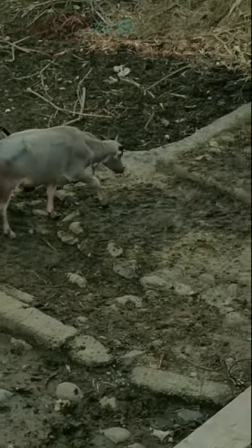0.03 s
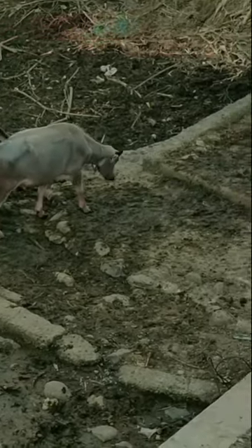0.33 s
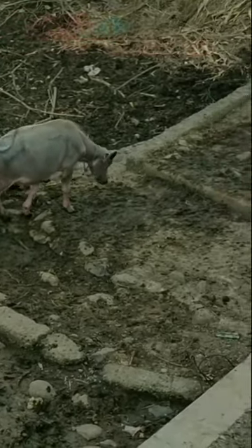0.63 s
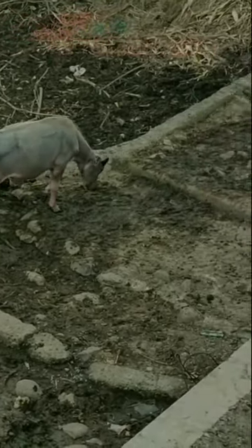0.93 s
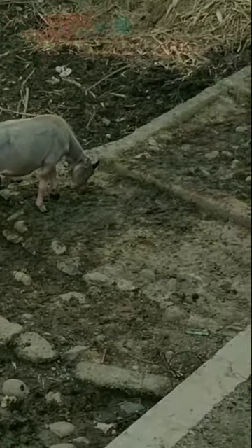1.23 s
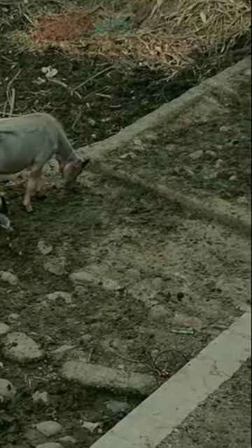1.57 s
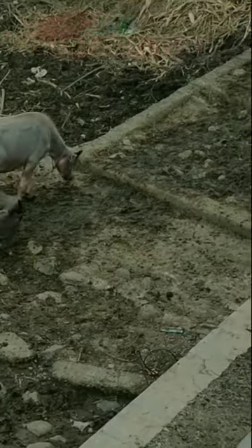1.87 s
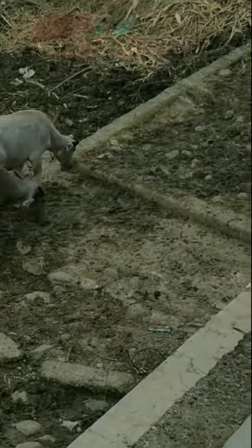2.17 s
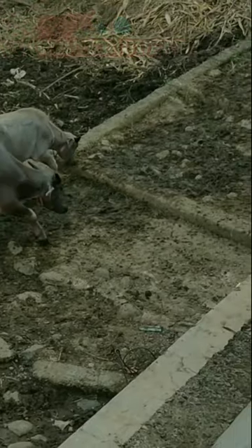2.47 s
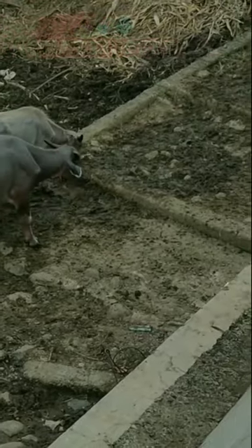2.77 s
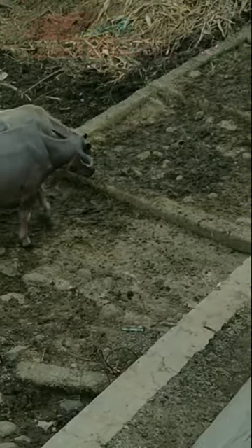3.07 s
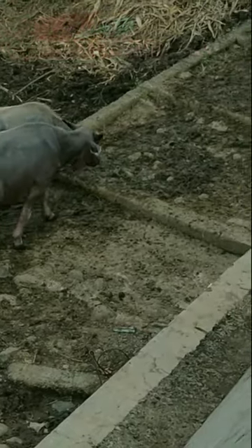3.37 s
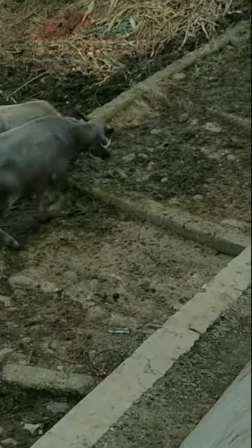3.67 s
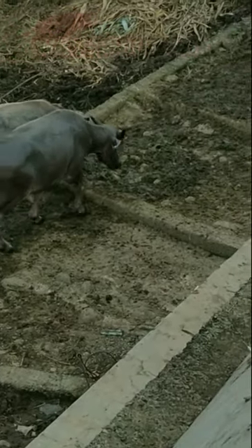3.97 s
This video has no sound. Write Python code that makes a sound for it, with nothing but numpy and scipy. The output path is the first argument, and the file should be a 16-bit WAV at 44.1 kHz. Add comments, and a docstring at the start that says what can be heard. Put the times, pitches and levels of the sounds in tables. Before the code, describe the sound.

A slow diesel engine, probably a small tractor, chugs past a yard, its beat gradually slowing. It throbs at a distance at first, swells from about 1 second and is loudest between 2 and 3 seconds, with distinct metallic knocking, then deepens and recedes. Tyre noise and distant traffic rumble underneath. Buffalo hooves thud dully in the first second and near the end, with faint muddy squelches between.

```python
"""A slow single-cylinder diesel, probably a small farm tractor, chugs past a muddy yard.
Its beat sinks from 30 to under 24 firings a second. Each firing is an exhaust thump, a puff of gas
and a metallic knock, smeared by the yard while far and distinct as it passes.
Tyre noise and farther traffic lie underneath; buffalo tread faintly in the mud."""
import sys
import numpy as np
from scipy import signal
from scipy.fft import rfft, irfft
from scipy.io import wavfile
from scipy.ndimage import uniform_filter1d

SR = 44100
rng = np.random.default_rng(int(sys.argv[2]) if len(sys.argv) > 2 else 0)


def dump_mix(stems):
    """Bounce the given channels to the path in sys.argv[1] as a 16-bit WAV at rate SR."""
    frames = np.atleast_2d(stems).T  # one column per channel
    limited = np.clip(frames, -1, 1)  # hard clip at full scale
    pcm = np.round(limited * 32767).astype(np.int16)
    wavfile.write(sys.argv[1], SR, pcm)


N = 176400
TIME_S, FREQ_HZ = np.arange(N) / SR, np.fft.rfftfreq(N, 1 / SR)
KNOCK_SPREAD_DB = .8
# Engine speed. Each row: time in seconds, firings per second.
FIRING_HZ = [(0, 30.2), (.7, 29.6), (1.1, 28.75), (1.3, 27.9), (1.7, 26.82), (2.1, 26.26), (2.3, 25.96),
             (2.85, 25.4), (3.02, 25.05), (3.3, 25.6), (3.5, 24.5), (3.7, 24.1), (4, 23.5)]


def firings(anchor_s=2.268):
    """Sample positions of the firings: one per engine cycle, phased to anchor_s, then jittered."""
    # Each row: time in seconds, timing scatter in seconds.
    jitter_s = [(0, 0.0007), (1.1, 0.00054), (1.5, 0.000065), (3.1, 0.00012), (3.45, 0.00078), (4, 0.0016)]
    cycles = np.cumsum(over_time(FIRING_HZ)) / SR
    at = np.flatnonzero(np.diff(np.floor(cycles - cycles[round(anchor_s * SR)])))
    offsets = over_time(jitter_s)[at] * SR * rng.standard_normal(len(at))
    return np.clip(at + offsets.astype(int), 0, N - 1)


def exhaust_thump(at, lag_s=.001, pass_s=2.02, turnover_s=.12):
    """Each firing rings the exhaust pipe, which sounds deeper once the vehicle has passed."""
    # Pipe from ahead and from behind. Each row: frequency in Hz, gain in dB.
    ahead_db = [(15, -63), (28, -51), (54, -30), (80, -24), (108, -11.5), (136, -2), (163, 1.5),
                (190, -14.5), (215, -11.5), (240, -12), (285, -22.5), (335, -20), (380, -25.5), (520, -27),
                (900, -51.5), (2000, -68)]
    behind_db = [(15, -58), (26, -38), (51, -22), (76, -34), (101, -8), (128, -0.5), (154, 3.5),
                 (180, -10.5), (235, -20.5), (280, -29.5), (305, -16.5), (330, -10.5), (380, -27),
                 (430, -33.5), (485, -27), (540, -32.5), (900, -45), (2000, -63.5)]
    # Each row: time in seconds, level in dB.
    level_db = [(0, -45), (.7, -44), (1.2, -29.5), (1.38, -29), (1.52, -26.5), (1.9, -24), (2.05, -21),
                (2.55, -23), (2.85, -23), (3.15, -27), (3.55, -27.5), (3.8, -31.5), (4, -31.5)]
    drive = impulses(np.minimum(at + round(lag_s * SR), N - 1), spread_db=0)
    behind = .5 + .5 * np.tanh((TIME_S - pass_s) / turnover_s)
    return fader(level_db) * ((1 - behind) * pipe(drive, ahead_db) + behind * pipe(drive, behind_db))


def pipe(drive, colour_db, muffler_hz=4000):
    """Impulses ring a muffled pipe, a minimum-phase filter."""
    muffler = 1 / (1 + (FREQ_HZ / muffler_hz) ** 4)
    log_gain = np.log(spectrum(colour_db) * muffler)
    mirrored = np.r_[log_gain, log_gain[-2:0:-1]]
    response = np.exp(signal.hilbert(mirrored).conj())[:len(log_gain)]
    return unit(irfft(mic_pair(response, 0 * response) * rfft(drive), N))


def yard_echo(at, drift_hz=.617):
    """Walls and ground scatter the thumps into a throb that shifts as the vehicle moves."""
    # Each row: time in seconds, level in dB.
    level_db = [(0, -37), (.9, -35.5), (1.6, -37.5), (2.4, -40.5), (3.1, -43.5), (4, -44)]
    drive = impulses(at, spread_db=2)
    angle = 2 * np.pi * drift_hz * TIME_S
    return fader(level_db) * (np.cos(angle) * yard_paths(drive) + np.sin(angle) * yard_paths(drive))


def yard_paths(drive, raw_t60_s=.462):
    """One random set of echo paths: a decaying noise tail, whitened, then coloured."""
    # Each row: frequency in Hz, gain in dB.
    colour_db = [(20, -37), (50, -28), (70, -26), (88, -18), (120, -12), (148, 0), (178, -4.5), (208, -2.5),
                 (240, -8.5), (275, -13.5), (340, -12), (520, -18.5), (900, -23), (2000, -57)]
    tails = rfft(rng.standard_normal((2, N)) * amp(-60 * TIME_S / raw_t60_s))
    response = mic_pair(*(tails / abs(tails))) * spectrum(colour_db)
    return unit(irfft(response * rfft(drive), N))


def exhaust_drone():
    """Two harmonics of the firing rate carry as clean tones during the approach."""
    # Each row: multiple of the firing rate, gain in dB.
    orders = [(7, 0), (8, -5)]
    # Each row: time in seconds, level in dB.
    level_db = [(0, -39), (.25, -34), (.8, -34), (1.2, -39), (1.7, -46), (2.3, -65)]
    cycles = np.cumsum(over_time(FIRING_HZ)) / SR
    tones = sum(amp(db) * np.sin(2 * np.pi * (k * cycles + rng.random())) for k, db in orders)
    return fader(level_db) * np.sqrt(2) * tones


def gas_puffs(at, lag_s=.0016, decay_s=.019):
    """Gas rushes out of the pipe after each firing; a hollow midrange pulses with it."""
    # Each row: frequency in Hz, gain in dB.
    colour_db = [(100, -23), (200, 5), (330, 4), (600, -1.5), (800, -4), (1100, -16.5), (1700, -22),
                 (2500, -22), (4000, -56)]
    # Each row: time in seconds, level in dB.
    gas_db = [(0, -36.5), (.6, -38), (1.3, -39.5), (1.9, -35), (2.05, -38), (2.2, -41), (2.36, -44),
              (2.5, -33.5), (2.8, -40.5), (3.1, -37), (3.6, -39.5), (4, -35)]
    hollow_db = [(0, -59), (.6, -48.5), (1.1, -58), (1.45, -62), (2.3, -64), (2.8, -55.5), (3.3, -51.5),
                 (3.7, -46.5), (4, -47)]
    gas = fader(gas_db) * noise(spectrum(colour_db)) * beats(at, lag_s, decay_s, rise_s=.00027)
    hollow = fader(hollow_db) * noise(resonance(hz=1085, width_hz=680))
    return gas + hollow * beats(at, lag_s, decay_s, rise_s=.00073)


def metal_clatter(at, lag_s=.0025):
    """Firings shake the engine metal: two drifting bands, a thin high ring and a sizzle."""
    # Each row: time in seconds, band centre in Hz.
    low_hz = [(0, 1698), (.22, 1620), (.45, 2096), (1.2, 2243), (1.7, 1923), (2.05, 1917), (2.8, 1999),
              (3.9, 1901)]
    high_hz = [(0, 2958), (.3, 2978), (1.6, 2721), (2.3, 2990), (3.55, 2628), (4, 2806)]
    # Each row: time in seconds, level in dB.
    low_db = [(0, -44), (.5, -46.5), (1, -55.5), (1.45, -55), (1.7, -47.5), (1.9, -46.5), (2.25, -61),
              (2.55, -71), (2.78, -51.5), (3.15, -71), (3.5, -57), (3.9, -47.5)]
    high_db = [(0, -45.5), (.25, -47), (.45, -56.5), (1.2, -65), (1.6, -50), (1.95, -54.5), (2.3, -55),
               (2.6, -65), (3.2, -85), (3.55, -54), (3.8, -46.5), (4, -51.5)]
    thin_db = [(0, -62.5), (.25, -55.5), (.6, -78), (1.4, -71.5), (2, -53.5), (2.2, -67), (3.1, -67.5),
               (3.6, -64), (4, -62)]
    sizzle_db = [(0, -58.5), (1.05, -61), (1.35, -53.5), (1.55, -53), (1.85, -58), (2.1, -64.5), (3.2, -63),
                 (3.7, -56), (4, -69.5)]
    # Each row: frequency in Hz, gain in dB.
    sizzle_colour_db = [(4000, -58), (6500, -6), (7600, -2), (8400, 2), (9300, -9), (12000, -10.5),
                        (15000, -19)]
    rings = fader(low_db) * ring(low_hz, width_hz=680)
    rings += fader(high_db) * ring(high_hz, width_hz=540)
    sizzle = fader(sizzle_db) * noise(spectrum(sizzle_colour_db))
    sizzle += fader(thin_db) * noise(resonance(hz=5950, width_hz=1400))
    rings = flutter(rings, depth_db=2.1, patch_s=.081, patch_hz=297.5)
    rings *= beats(at, lag_s, decay_s=.010, rise_s=.00023)
    return rings + flutter(sizzle, depth_db=3.5) * beats(at, lag_s, decay_s=.015, rise_s=.0021)


def diesel_knock(at):
    """Ignition cracks, the open engine side clacks in passing, the exhaust mouth slaps from behind."""
    # Each row: frequency in Hz, gain in dB.
    crack_colour_db = [(400, 12.5), (1200, 3.5), (2800, -12), (3900, -2.5), (4800, -7.5), (6000, -11.5),
                       (8200, -12.5), (10000, -28), (15000, -42)]
    slap_colour_db = [(150, -25), (330, 0), (600, 2), (900, -1.5), (1500, -5.5), (2300, -6.5), (2900, -24),
                      (5000, -42)]
    # Each row: time in seconds, level in dB.
    crack_db = [(0, -62), (1.4, -66), (2, -50), (2.27, -44), (2.42, -56), (2.78, -58), (3.1, -60), (4, -54)]
    clack_db = [(1.4, -79), (1.7, -46), (1.78, -46.5), (1.855, -40), (1.895, -46), (2.0, -41),
                (2.08, -47.5), (2.3, -63), (2.78, -77), (3.1, -73)]
    slap_db = [(2.2, -58), (2.45, -45), (2.62, -42), (2.8, -41), (3.0, -44.5), (3.2, -52), (4, -56)]
    crack = bursts(at, spectrum(crack_colour_db), lag_s=.0028, decay_s=.003, rise_s=.0018)
    clack = bursts(at, resonance(hz=1900, width_hz=560), lag_s=.0023, decay_s=.0035, rise_s=.0009)
    slap = bursts(at, spectrum(slap_colour_db), lag_s=.0022, decay_s=.0042, rise_s=.0009)
    return fader(crack_db) * crack + fader(clack_db) * clack + fader(slap_db) * slap


def bursts(at, gain, lag_s, decay_s, rise_s, wall_delay_s=.0081, wall_db=-2.5):
    """A hard noise burst at each firing, and its bounce off a nearby wall."""
    shape = pulse(SR // 20, lag_s, decay_s, rise_s)
    strike = signal.oaconvolve(impulses(at, KNOCK_SPREAD_DB), shape)[:N]
    bounce = amp(wall_db) * np.roll(strike, round(wall_delay_s * SR))
    return unit(np.hypot(strike, bounce) * noise(gain))


def beats(at, lag_s, decay_s, rise_s):
    """Envelope that flares at each firing, over a wash that grows with distance."""
    # Each row: time in seconds, share of the power arriving in distinct beats (0-1).
    direct_share = [(0, 0), (1.1, 0.38), (1.55, 0.52), (1.85, 0.45), (2.3, 0.73), (2.8, 0.2), (3.3, 0.25),
                    (4, 0.1)]
    shape = pulse(SR // 10, lag_s, decay_s, rise_s)
    power = signal.oaconvolve(impulses(at, KNOCK_SPREAD_DB) ** 2, shape ** 2)[:N]
    share = over_time(direct_share)
    return np.sqrt(1 - share + share * abs(power) / power.mean())


def running_noise():
    """Tyres and chassis rush along; a deep rumble wells up behind the vehicle."""
    # Each row: frequency in Hz, gain in dB.
    colour_db = [(300, 5.5), (520, 4.5), (700, -0.5), (1000, -1), (1300, 0.5), (2400, -9), (3300, -13.5),
                 (4000, -20), (4900, -24), (5600, -17.5), (7000, -19), (8400, -36), (9400, -44),
                 (10800, -24.5), (14000, -35), (15000, -53)]
    # Each row: time in seconds, level in dB.
    roll_db = [(0, -40.5), (.5, -38), (1.2, -39), (1.9, -40), (2.3, -42), (3.1, -44.5), (3.6, -40),
               (4, -46)]
    deep_db = [(0, -47), (.5, -48), (3.2, -64), (3.6, -43), (3.85, -40.5), (4, -33.5)]
    deep = fader(deep_db) * noise(resonance(hz=95, width_hz=64))
    return deep + fader(roll_db) * flutter(noise(spectrum(colour_db)), depth_db=2.5)


def hoof_squelches(grain_db=7, relative_width=.58):
    """Each step in the mud is a short swell of wet crackle."""
    # Each row: start in seconds, length in seconds, level in dB, centre in Hz, left minus right in dB.
    steps = [(0.397, 0.058, -59, 4200, 13), (1.522, .06, -58, 11800, -4), (1.834, .012, -61, 9000, 2),
             (1.965, 0.065, -67, 11500, -2), (2.461, 0.069, -52.5, 7150, -1),
             (3.403, 0.053, -54.5, 3500, 0), (3.571, 0.015, -45.5, 2460, 4)]
    out = np.zeros((2, N))
    for start_s, length_s, db, hz, pan_db in steps:
        size = round(length_s * SR)
        grains = rng.standard_normal((2, size)) * amp(grain_db * np.minimum(rng.exponential(1, size), 2))
        wet = unit(irfft(rfft(grains) * resonance(hz, hz * relative_width, size), size))
        swell = np.sin(np.pi * np.sqrt(np.arange(size) / size))
        gains = amp([[db + pan_db / 2], [db - pan_db / 2]])
        out[:, round(start_s * SR):][:, :size] += wet * swell * gains
    return out


def hoof_thuds(hz=152.4, peak_s=.013):
    """Short, dull thuds, probably heavy hooves landing."""
    # Each row: start in seconds, level in dB.
    landings = [(0.104, -25), (0.537, -24.5), (0.832, -25), (3.949, -21)]
    out, t = np.zeros(N), TIME_S[:SR // 10]
    thud = -np.sin(2 * np.pi * hz * t) * (t / peak_s) * np.exp(2 - 2 * t / peak_s)
    for start_s, db in landings:
        part = out[round(start_s * SR):][:len(t)]
        part += amp(db) * thud[:len(part)]
    return out


def far_traffic():
    """Farther traffic rumbles, and one engine in it hums a low, wavering note."""
    # Each row: frequency in Hz, gain in dB.
    colour_db = [(15, -19), (35, -10), (55, -3), (69, -16.5), (86, -16), (115, -1), (142, 12), (180, 3),
                 (240, -10.5), (330, -9.5), (700, -20), (2000, -62)]
    # Each row: time in seconds, level in dB.
    rumble_db = [(0, -32.5), (.9, -34), (1.6, -35.5), (2.4, -29), (3.1, -38), (3.55, -29), (3.8, -37),
                 (4, -39)]
    hum_db = [(0, -42.5), (1.4, -45.5), (2.2, -44.5), (4, -54)]
    rumble = fader(rumble_db) * noise(spectrum(colour_db))
    return rumble + fader(hum_db) * noise(resonance(hz=70, width_hz=13))


def mic_pair(a, b):
    """Two unrelated spectra become what the left and right microphones hear."""
    # Each row: frequency in Hz, left-right coherence (0-1).
    coherence = [(60, 0.86), (150, 0.91), (300, 0.99), (630, 0.73), (1400, 0.62), (3000, 0.11),
                 (7000, 0.044)]
    # Each row: frequency in Hz, left minus right in dB.
    balance_db = [(120, 0), (400, 2), (750, 3), (1000, 1.5), (1400, 4.5), (2000, 8), (3000, 6), (4200, 3),
                  (4900, -2.5), (6000, 9), (7200, -3.5), (8300, -12.5), (9500, 0.5), (12000, 1)]
    # Each row: frequency in Hz, phase lead of the left in radians.
    lead_rad = [(130, 0.23), (400, 0.52), (780, 0.85), (1400, 2.73), (2200, 3.4), (3000, 6.1)]
    common, tilt = over_hz(coherence), amp(over_hz(balance_db) / 2)
    right = (common * a + np.sqrt(1 - common ** 2) * b) * np.exp(-1j * over_hz(lead_rad))
    return np.array([a * tilt, right / tilt])


def impulses(at, spread_db):
    """One impulse per firing, its strength scattered by spread_db."""
    return np.bincount(at, amp(spread_db * rng.standard_normal(len(at))), N)


def pulse(size, lag_s, decay_s, rise_s):
    """Delayed envelope with exponential rise and decay."""
    t = np.maximum(TIME_S[:size] - lag_s, 0)
    return (1 - np.exp(-t / rise_s)) * np.exp(-t / decay_s)


def ring(centre_hz, width_hz):
    """Noise in a resonance whose centre follows a curve."""
    hz = over_time(centre_hz)
    band = signal.hilbert(noise(resonance(hz.mean(), width_hz)))
    return (band * np.exp(2j * np.pi * np.cumsum(hz - hz.mean()) / SR)).real


def flutter(x, depth_db, patch_s=.12, patch_hz=450):
    """The level wavers in small patches of time and frequency."""
    hz, t, bins = signal.stft(x, SR, nperseg=512, noverlap=384)
    field = rng.standard_normal((2, len(t), len(hz)))
    field = uniform_filter1d(field, round(patch_s / t[1]), axis=1)
    field = uniform_filter1d(field, round(patch_hz / hz[1]), axis=2)
    bins *= amp(depth_db * field / field.std()).transpose(0, 2, 1)
    return signal.istft(bins, SR, nperseg=512, noverlap=384)[1][:, :N]


def noise(gain):
    """Stereo noise of a given spectrum."""
    return unit(irfft(mic_pair(*rfft(rng.standard_normal((2, N)))) * gain, N))


def resonance(hz, width_hz, size=N):
    """Gain of a resonance, width_hz wide at half gain."""
    return 1 / (1 + ((np.fft.rfftfreq(size, 1 / SR) - hz) / (width_hz / 2)) ** 2)


def amp(db):
    """Decibels to gain."""
    return 10 ** (np.asarray(db) / 20)


def unit(x):
    """Scales the centre of a stereo sound to rms 1."""
    return x / np.sqrt(np.mean(x.mean(0) ** 2) + 1e-20)


def over_hz(points):
    """A curve at every FFT bin, interpolated in log frequency."""
    hz, value = np.transpose(points)
    return np.interp(np.log(FREQ_HZ + 1), np.log(hz + 1), value)


def over_time(points):
    """A curve at every sample."""
    return np.interp(TIME_S, *np.transpose(points))


def spectrum(colour_db):
    """Gain per FFT bin."""
    return amp(over_hz(colour_db))


def fader(level_db):
    """Gain per sample."""
    return amp(over_time(level_db))


def scene():
    """The passing vehicle and its echo, the animals and farther traffic."""
    at = firings()
    exhaust = exhaust_thump(at) + yard_echo(at) + exhaust_drone() + gas_puffs(at)
    vehicle = exhaust + metal_clatter(at) + diesel_knock(at) + running_noise()
    return vehicle + hoof_squelches() + hoof_thuds() + far_traffic()


def record(dry, low_cut_hz=42, high_cut_hz=14700):
    """Low cut and band limit."""
    thinned = irfft(rfft(dry) * FREQ_HZ ** 2 / np.sqrt(FREQ_HZ ** 4 + low_cut_hz ** 4), N)
    lowpass = signal.firwin(401, high_cut_hz, window=("kaiser", 9), fs=SR)
    return signal.oaconvolve(thinned, lowpass[None], "same")


dry = scene()
out = record(dry)
dump_mix(out)
```